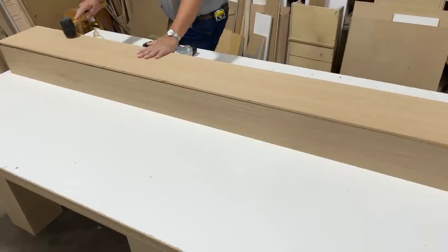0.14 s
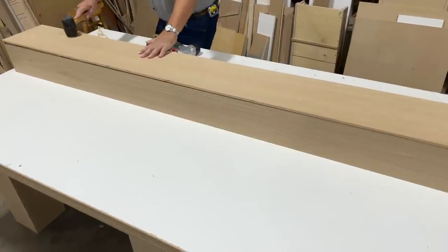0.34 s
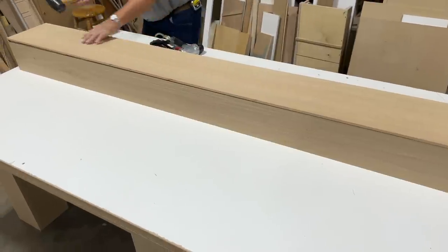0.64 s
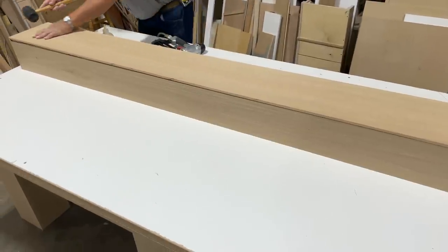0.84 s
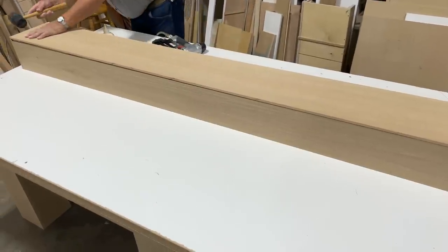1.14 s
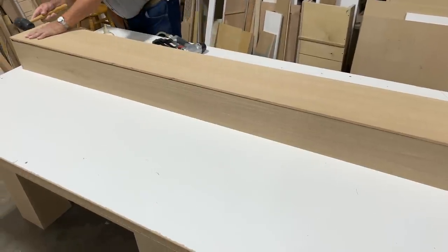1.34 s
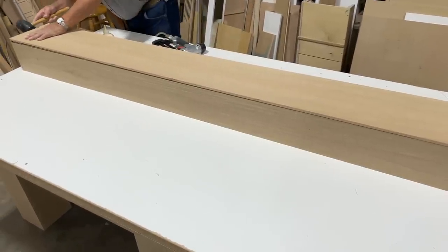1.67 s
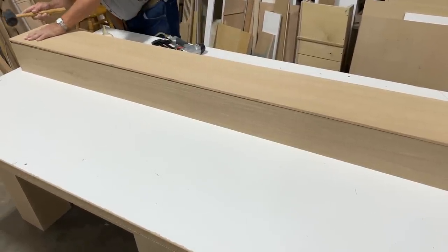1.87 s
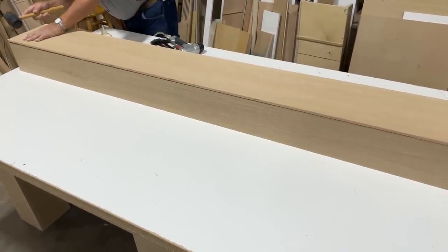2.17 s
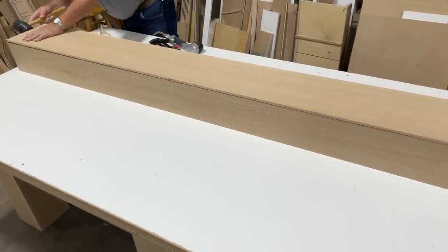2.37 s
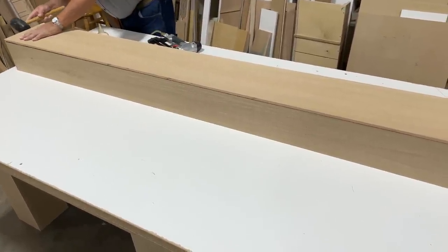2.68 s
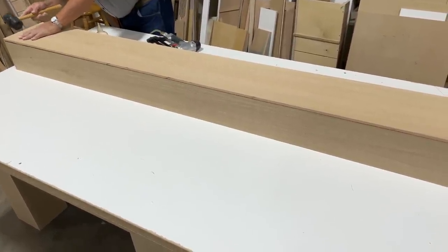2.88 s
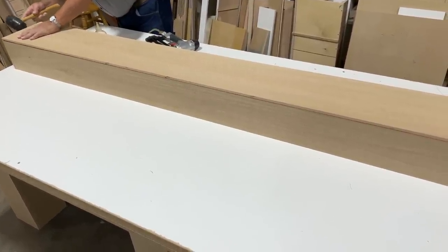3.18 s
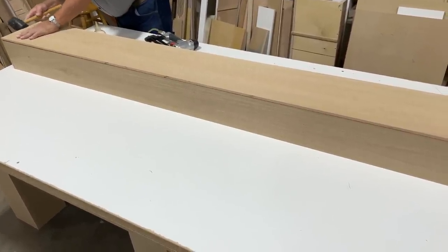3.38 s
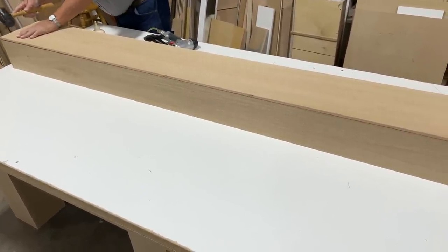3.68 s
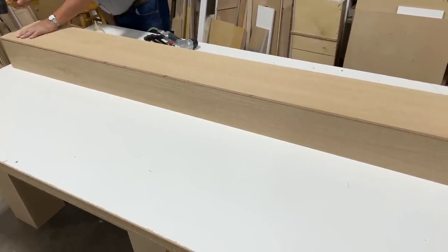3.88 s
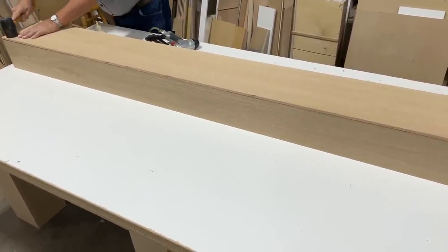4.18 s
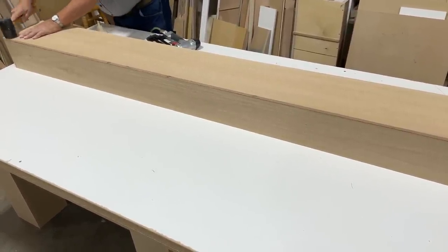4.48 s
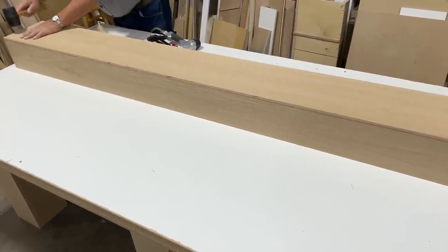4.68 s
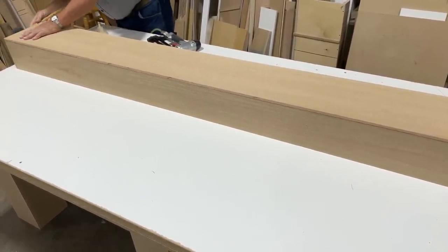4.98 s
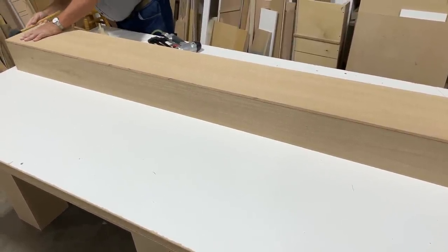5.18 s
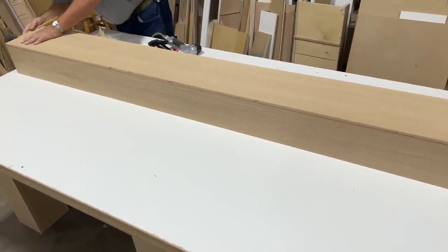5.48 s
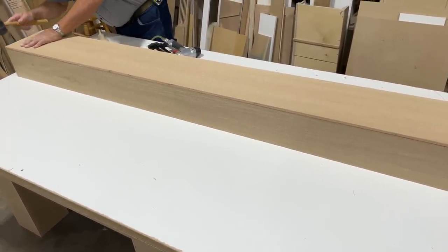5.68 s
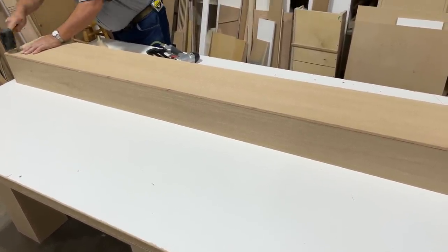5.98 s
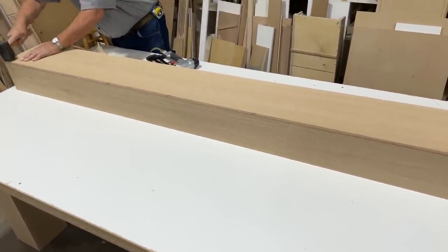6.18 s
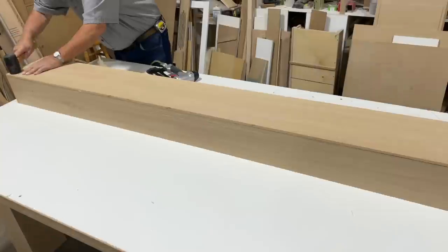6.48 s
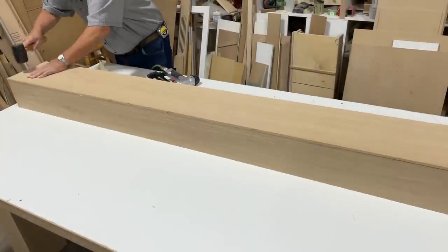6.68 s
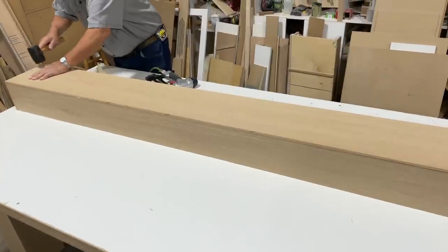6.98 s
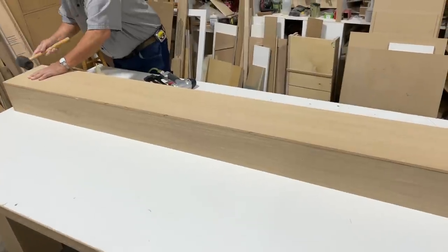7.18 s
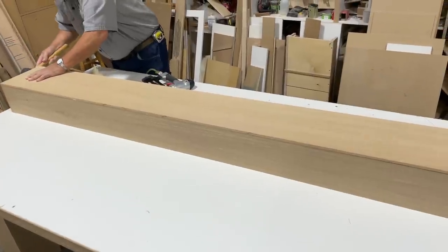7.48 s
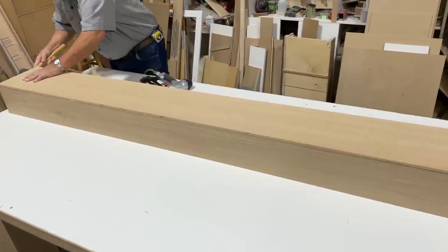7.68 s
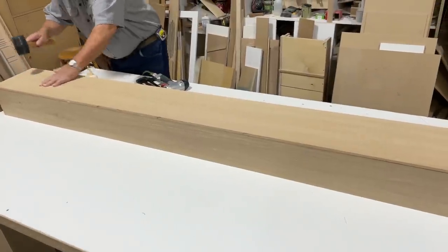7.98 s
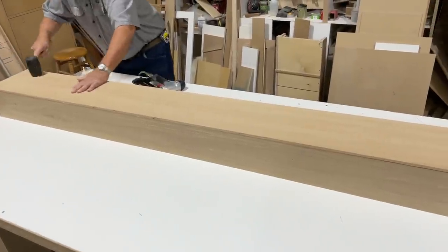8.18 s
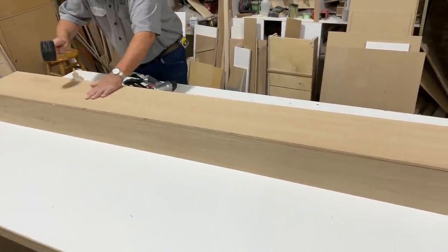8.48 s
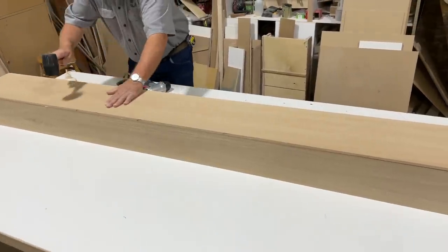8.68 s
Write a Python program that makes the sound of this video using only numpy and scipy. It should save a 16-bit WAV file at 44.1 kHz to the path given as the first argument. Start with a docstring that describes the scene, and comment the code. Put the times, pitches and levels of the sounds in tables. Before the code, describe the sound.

Heavy mallet thumps on a hollow wooden box, growing harder and overloaded, with pauses, faint hand rubs and reverberant room sound.

```python
"""The echo of an earlier blow dies over a faint room floor, then a rubber mallet starts to strike.
It drives a long hollow plywood box together on a bench in a cluttered workshop: each blow is a noise crack,
a sum of decaying modes and a wash of noise bands for the small modes and the room's echo.
Between blows a hand slides along the top board and feet shift, both as shaped noise.
Hard blows push the recorder into its limiter and overload it."""
import sys
import numpy as np
from scipy import signal
from scipy.fft import rfft, irfft
from scipy.io import wavfile

SR = 44100
rng = np.random.default_rng(int(sys.argv[2]) if len(sys.argv) > 2 else 0)


def waveform_to_disk(signal):
    """Save audio, clipped to [-1, 1], as 16-bit WAV at the path in sys.argv[1]."""
    frames = np.transpose(np.atleast_2d(signal))
    scaled = np.clip(frames, -1, 1) * 32767
    samples = np.round(scaled).astype(np.int16)
    wavfile.write(sys.argv[1], SR, samples)


def field_ratio(decibels):
    """Amplitude ratio for a level in dB (20 dB per decade); scalars and array-likes work."""
    return 10 ** (np.asarray(decibels, dtype=float) / 20)


N = 389844   # samples

# Mallet blows. Each row: time in s, strength in dB, hardness as drive at 5 kHz in dB, crack in dB;
# the last two are relative to strength.
BLOWS = [(0.133, 1.5, -20, 3), (0.314, 1.5, -19, -1.5), (1.331, -10.5, -17, 5.5), (1.66, 0, -22, 4.5),
         (2.001, 5, -16, 9), (2.349, 3.5, -19, 4), (2.693, 2, -15.5, 4), (3.033, 4.5, -14, 4.5),
         (3.368, 1.5, -17.5, 1.5), (4.181, 8, -7.5, 9), (4.477, 11, -5.5, 10), (5.38, -8.5, -17.5, -8.5),
         (5.773, -38, -18, 0.5), (5.912, 7, -10, -1), (6.19, 11.5, -10, 1), (6.469, 12.5, -6, -1.5),
         (7.344, 1.5, -10.5, -5), (7.587, 1, -12, 1), (8.105, 8, -11.5, 6.5)]
# The head bounces and lands again. Each row: time in s, strength in dB, crack in dB relative to strength.
REBOUNDS = [(1.705, -9.5, 10), (2.725, -4, 0.5)]
# Where the mallet lands, which sets the panel that rings most. Each row: in use from, in s, ring centre in Hz,
# ring boost in dB, ring width in octaves, thump at 170 Hz in dB, crack centre in Hz.
SPOTS = [(0, 436, 2.5, 0.36, -6.5, 1728), (1.2, 306, 3, 0.49, -8, 1408),
         (1.55, 690, 3.5, 0.27, -12.5, 2520), (1.9, 726, 3, 0.37, -12, 2560),
         (4.0, 1200, 4.5, 0.6, -10, 1530), (4.4, 946, 1.5, 0.72, -8.5, 2600),
         (5.2, 530, 14.5, 0.12, -15.5, 900), (5.7, 324, 2.5, 0.55, -7, 1400),
         (5.87, 408, 1.5, 0.32, -9, 2500), (6.1, 965, 1.5, 0.53, -10, 1378),
         (7.2, 520, 5.5, 0.22, -11.5, 1108), (8.0, 615, 7, 0.49, -12, 2480)]
# The box's clearest modes. Each row: frequency in Hz, relative level in dB, t60 in s.
BOX_MODES = [(59.7, -15.5, 0.19), (86.5, -4, 0.2), (128.8, -1, 0.33), (138, -7, 0.3), (148.7, 4.5, 0.24),
             (191, 2, 0.19), (292, -8, 0.12), (368.8, -7, 0.13), (450.6, -11.5, 0.17), (517.6, -9, 0.15),
             (566.5, -14, 0.28), (642.4, -9.5, 0.099), (691, -18.5, 0.38), (801, -16.5, 0.25),
             (1080, -22, 0.36)]
# Its many small modes, too close to tell apart. Each row: frequency in Hz, dB per third octave, t60 in s.
SMALL_MODES = [(60, -22, 0.094), (189, -5.5, 0.059), (495, -8.5, 0.088), (1200, -10, 0.13),
               (2500, -8, 0.12), (5040, -14, 0.098), (12000, -27, .02)]
# Spectrum of the crack. Each row: frequency in Hz, relative density in dB per Hz.
CRACK_SPECTRUM = [(700, -23), (1500, -11), (3000, -3), (5200, -6.5), (8000, -16.5), (15000, -38)]
# Likeness of left and right in sound from the box. Each row: frequency in Hz, likeness (1 is identical).
BOX_LIKENESS = [(60, 0.56), (130, 1), (400, 0.48), (1500, 0.82), (6000, 0.46)]
# The workshop's echo. Each row: frequency in Hz, dB per third octave, t60 in s, left-right likeness.
SHOP_ECHO = [(48.9, -58.5, 0.92, 0), (127, -24.5, 0.6, 1), (365, -26.5, 0.63, 0.32), (594, -25, 0.78, 0.24),
             (960, -22, 0.67, 0.02), (2260, -21, 0.85, 0), (6260, -17.5, 0.42, .0),
             (14000, -26.5, 0.11, 0.49)]
# Strokes of the hand on the board. Each row: start in s, length in s, level in dB.
SLIDES = [(0.856, .07, -41), (7.99, 0.24, -40), (8.425, 0.24, -37)]
# Spectrum of skin on plywood. Each row: frequency in Hz, relative density in dB per Hz.
SKIN_SPECTRUM = [(180, -54), (300, -16), (509, -19), (808, -21.5), (953, -18.5), (2650, -12.5), (3690, -10),
                 (4350, -10.5), (15500, -19)]
# Soft low thuds, as of feet on the floor. Each row: time in s, level in dB.
STEPS = [(7.95, -39.5), (8.03, -43)]
# Spectrum of a thud. Each row: frequency in Hz, relative density in dB per Hz.
STEP_SPECTRUM = [(50, -12.5), (80, -3), (125, 3.5), (170, -8), (300, -35.5)]
# Spectrum of the room floor. Each row: frequency in Hz, relative density in dB per Hz.
FLOOR_SPECTRUM = [(15, -25.5), (25, -2.5), (119, 3), (188, -3.5), (289, -4), (331, -9.5), (552, -7),
                  (945, -10), (1620, -11.5), (2010, -13), (10100, -5), (13500, -8), (15500, -9)]
# Likeness of left and right in the room floor. Each row: frequency in Hz, likeness (1 is identical).
FLOOR_LIKENESS = [(60, .5), (240, .2), (1000, 0), (15000, 0)]

SWELL_S = 0.003   # base time constant at 500 Hz with which the wood starts to sound


def mallet(modes_db=-3.5, scatter_db=3.0, slap_db=14.0, slap_octaves=0.5, crack_rise_s=0.0007):
    """Modal synthesis: an impact excites damped normal modes, beside a broadband crack of a few milliseconds."""
    detune = 0.025   # fractional spread: modes shift from blow to blow as the board seats and the hand damps it
    t = np.arange(round(0.5 * SR)) / SR
    hz, level_db, t60 = np.transpose(BOX_MODES)
    # bending waves run faster at high pitch, so the low modes swell later
    swell = (1 - np.exp(-t / (SWELL_S * np.sqrt(500 / hz))[:, None])) ** 2
    dying = swell * field_ratio(-60 * t / t60[:, None])
    snap = (1 - np.exp(-t / crack_rise_s)) ** 2 * field_ratio(-60 * t / 0.016)
    grid_hz = np.geomspace(300, 16000, 60)
    out = np.zeros((2, N + len(t)))
    for contact, drive_db in zip(contacts(), contact_db(hz)):
        s, strength_db, _, crack_db, crack_hz, dull_db_per_octave = contact
        level_draw, mid_draw, side_draw, pitch_draw = rng.standard_normal((4, len(hz)))
        mode_hz = hz * (1 + detune * pitch_draw)
        modes = dying * np.sin(2 * np.pi * mode_hz[:, None] * t)
        struck = field_ratio(level_db + modes_db + drive_db + scatter_db * level_draw)
        radiated = pair(at_hz(BOX_LIKENESS, hz), np.sign(mid_draw), side_draw) * struck
        slap = at_hz(CRACK_SPECTRUM, grid_hz) + slap_db * hump(grid_hz, crack_hz, slap_octaves)
        slap = slap - dull_db_per_octave * np.log2(grid_hz)
        noise = coloured(np.c_[grid_hz, slap], BOX_LIKENESS, len(t))
        crack = field_ratio(strength_db + crack_db) * snap * noise
        at = round((s - crack_rise_s) * SR)
        out[:, at:at + len(t)] += radiated @ modes + crack
    return out[:, :N]


def contacts():
    """Impacts, primary and rebound: (s, strength dB, treble dB, crack dB, crack Hz, crack dulling dB per octave)."""
    blows = [(*blow, spot(blow[0])[5], 0) for blow in BLOWS]
    # a rebound is a soft contact with a duller crack
    rebounds = [(s, db, -26.5, crack_db, 1000, 8.5) for s, db, crack_db in REBOUNDS]
    return blows + rebounds


def contact_db(hz):
    """Impact spectrum: strength, hardness and landing spot set how each contact (row) drives each pitch (column)."""
    rows = []
    for s, strength_db, bright_db, *_ in contacts():
        _, ring_hz, ring_db, octaves, thump_db, _ = spot(s)
        # a stronger blow flattens the rubber faster and knocks brighter at 1.9 kHz
        knock_db = max(-8.5 + 0.605 * strength_db, -16)
        top_db = 4 + 1.6 * bright_db   # hardness tells even more at 12 kHz
        touch = [(170, thump_db), (280, 0), (1000, 0), (1900, knock_db), (5000, bright_db), (12000, top_db)]
        rows.append(strength_db + at_hz(touch, hz) + ring_db * hump(hz, ring_hz, octaves))
    return np.array(rows)


def spot(s):
    """Point of excitation: the row of the landing spot in use at a moment."""
    return [row for row in SPOTS if row[0] <= s][-1]


def wash(build_s=0.0033, earlier_db=-32.5):
    """Statistical acoustics: dense modes act as noise bands; small modes die fast, the echo builds and lingers."""
    edges = 35 * 2 ** np.arange(0, 9, 1 / 5)   # Hz, five bands an octave
    centres = np.sqrt(edges[1:] * edges[:-1])
    at = [round(contact[0] * SR) for contact in contacts()]
    white = rng.standard_normal((2, 2, N))   # neighbouring bands get unrelated noise
    out = np.zeros((2, N))
    for k, (hz, drive_db) in enumerate(zip(centres, contact_db(centres).T)):
        strikes = np.full(N, 1e-18)
        strikes[at] = field_ratio(2 * drive_db)   # doubled dB give power
        wood_fade = fade(strikes, at_hz(SMALL_MODES, hz, size=2), 2 * SWELL_S * 500 / hz)
        wood = field_ratio(2 * at_hz(SMALL_MODES, hz)) * wood_fade
        strikes[0] = field_ratio(2 * earlier_db)   # echo of an earlier blow still dying at the start
        echo = field_ratio(2 * at_hz(SHOP_ECHO, hz)) * fade(strikes, at_hz(SHOP_ECHO, hz, size=2), build_s)
        alike = (wood * at_hz(BOX_LIKENESS, hz) + echo * at_hz(SHOP_ECHO, hz, size=3)) / (wood + echo)
        band = signal.butter(2, edges[k:k + 2], "band", fs=SR, output="sos")
        noise = signal.sosfilt(band, white[k % 2])
        # five bands an octave share the power of three
        mid, side = noise / noise.std() * np.sqrt(3 / 5)
        out += np.sqrt(wood + echo) * pair(alike, mid, side)
    return out


def workshop(x, echo_db=-11.5, t60=0.47, first_echo_s=0.017):
    """Reverberation of modes and cracks from the walls: convolution with decaying noise of unit energy."""
    t = np.arange(round(0.9 * SR)) / SR
    decay = (t > first_echo_s) * field_ratio(-60 * t / t60)
    noise = coloured([(120, -12), (400, 0), (15000, 0)], BOX_LIKENESS, len(t))
    echo = noise * decay / np.sqrt(np.sum(decay ** 2))
    mono = x.mean(axis=0)[None]
    return field_ratio(echo_db) * signal.fftconvolve(mono, echo)[:, :N]


def hand(rise_db_per_s=146.5, fall_db_per_s=218):
    """Friction noise: skin rubbing smooth plywood gives a soft bright hiss that swells, holds and fades."""
    t = np.arange(N) / SR
    level = np.zeros(N)
    for start, length, db in SLIDES:
        before_s = np.maximum(start - t, 0)
        after_s = np.maximum(t - start - length, 0)
        level += field_ratio(db - rise_db_per_s * before_s - fall_db_per_s * after_s)
    return level * coloured(SKIN_SPECTRUM, BOX_LIKENESS, N)


def steps(t60=0.36, rise_s=0.008):
    """Impulsive excitation of a damped floor: low noise swells briefly and dies at each thud."""
    strikes = np.full(N, 1e-18)
    for s, db in STEPS:
        strikes[round(s * SR)] = field_ratio(2 * db)
    return np.sqrt(fade(strikes, t60, rise_s)) * coloured(STEP_SPECTRUM, BOX_LIKENESS, N)


def room_floor(level_db=-43.5):
    """Stationary background: steady Gaussian noise with a fixed spectrum."""
    return field_ratio(level_db) * coloured(FLOOR_SPECTRUM, FLOOR_LIKENESS, N)


def fade(strikes, t60, rise_s):
    """Exponential energy decay: power swells after each strike and falls 60 dB in t60."""
    keep = np.exp(-1 / (t60 / np.log(1e6) * SR))
    power = signal.lfilter([1], [1, -keep], strikes)
    keep = np.exp(-1 / (rise_s * SR))
    return signal.lfilter([1 - keep], [1, -keep], power)


def coloured(spectrum, likeness, count):
    """Spectral shaping: stereo white noise weighted by frequency, scaled to rms 1."""
    hz = np.arange(count // 2 + 1) * SR / count
    mid, side = rfft(rng.standard_normal((2, count)))
    x = irfft(pair(at_hz(likeness, hz), mid, side) * field_ratio(at_hz(spectrum, hz)), count)
    return x / np.sqrt(np.mean(x ** 2))


def pair(alike, mid, side):
    """Interchannel correlation: left and right share one draw and oppose in another."""
    alike = np.clip(alike, -1, 1)
    common = np.sqrt(1 + alike) * mid
    opposed = np.sqrt(1 - alike) * side
    return np.array([common + opposed, common - opposed]) / np.sqrt(2)


def at_hz(points, hz, size=1):
    """Interpolation on a log-frequency axis of column number `size` of a table."""
    points = np.array(points)
    return np.interp(np.log(np.maximum(hz, 1)), np.log(points[:, 0]), points[:, size])


def hump(hz, centre_hz, octaves):
    """Resonance region: a Gaussian bell on a log-frequency axis, 1 on top."""
    return np.exp(-0.5 * (np.log2(hz / centre_hz) / octaves) ** 2)


def scene():
    """Superposition of the blows, their echo and wash, the hand, the feet and the room floor."""
    blows = mallet()
    return blows + workshop(blows) + wash() + hand() + steps() + room_floor()


def top_cut(x):
    """Nothing passes above the cut-off."""
    return signal.sosfilt(signal.butter(12, 15670, fs=SR, output="sos"), x)


def record(dry, limit_db=5.5, squeeze=0.073, attack_s=0.0013, release_db_per_s=138.5):
    """Limiting and overload: a fraction `squeeze` of the excess is turned down, the rest clips at full scale."""
    ramp = release_db_per_s * np.arange(N) / SR
    peak_db = 20 * np.log10(np.abs(dry).max(axis=0) + 1e-9)
    over_db = np.maximum(peak_db - limit_db, 0)
    # the excess is held at its peak and released at a steady rate
    held_db = np.maximum.accumulate(over_db + ramp) - ramp
    keep = np.exp(-1 / (attack_s * SR))
    cut_db = squeeze * signal.lfilter([1 - keep], [1, -keep], held_db)
    mix = np.clip(dry * field_ratio(-cut_db), -1, 1)
    return top_cut(mix)


dry = scene()
out = record(dry)
waveform_to_disk(out)
```